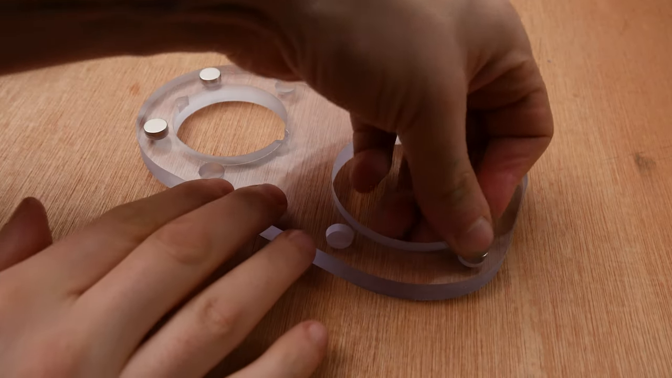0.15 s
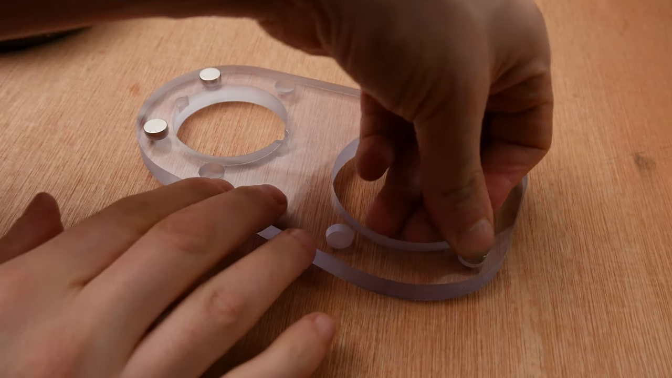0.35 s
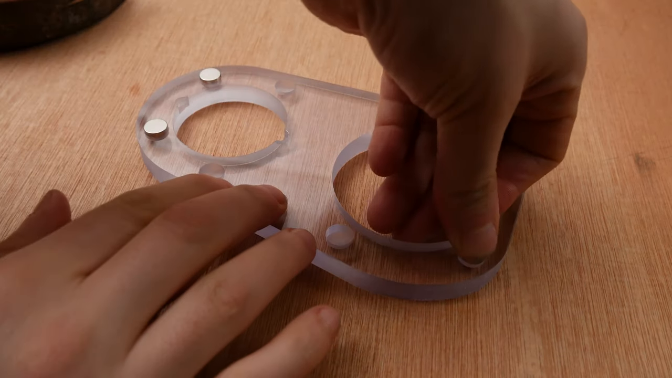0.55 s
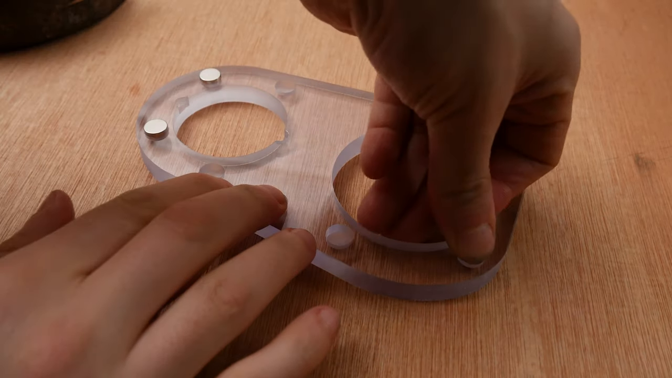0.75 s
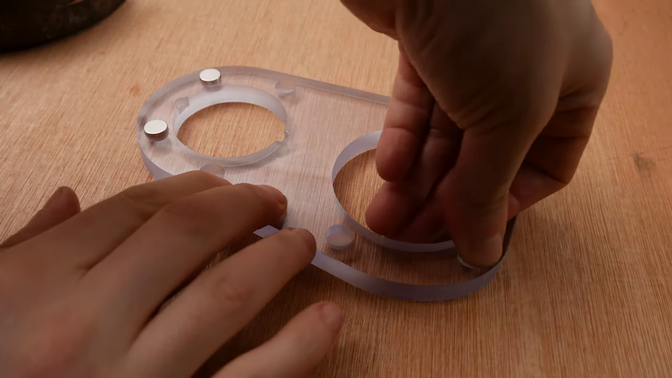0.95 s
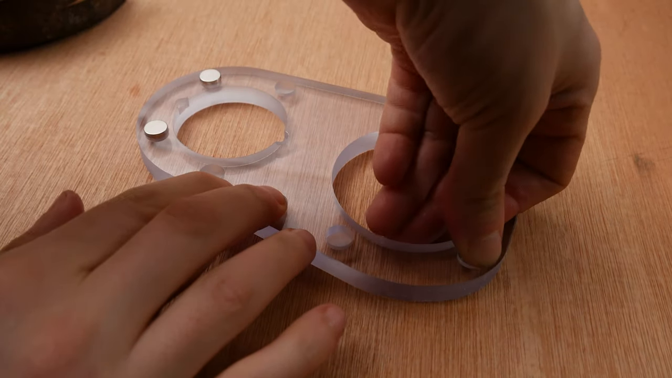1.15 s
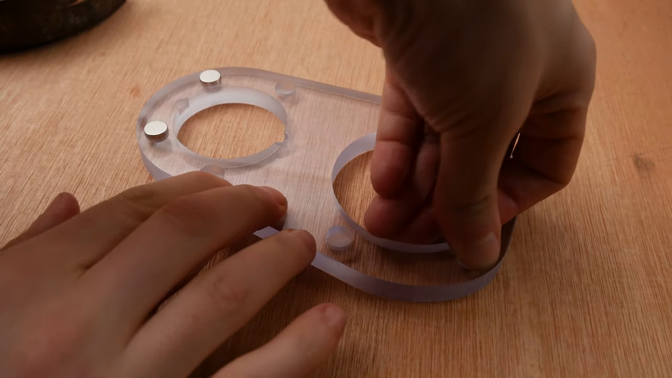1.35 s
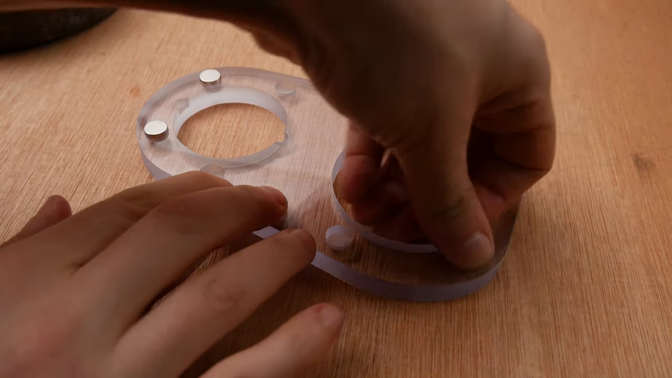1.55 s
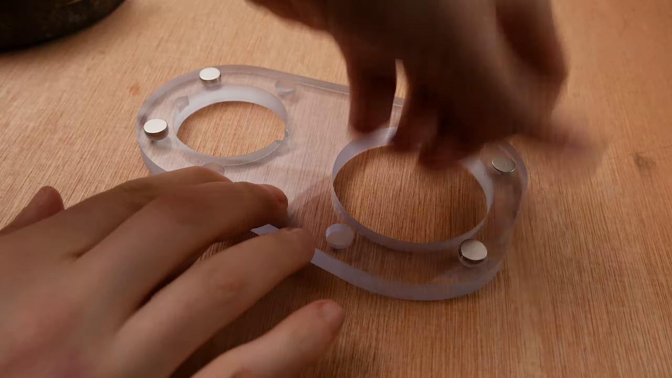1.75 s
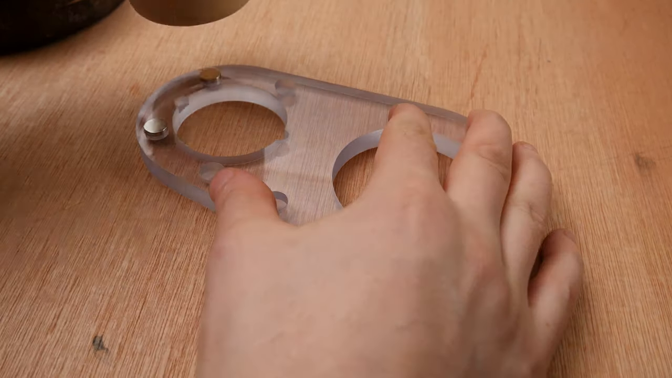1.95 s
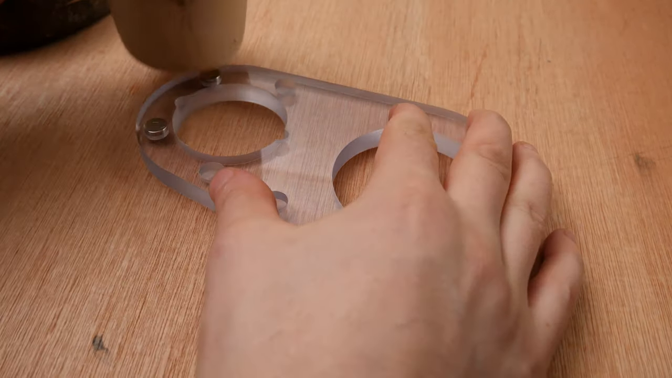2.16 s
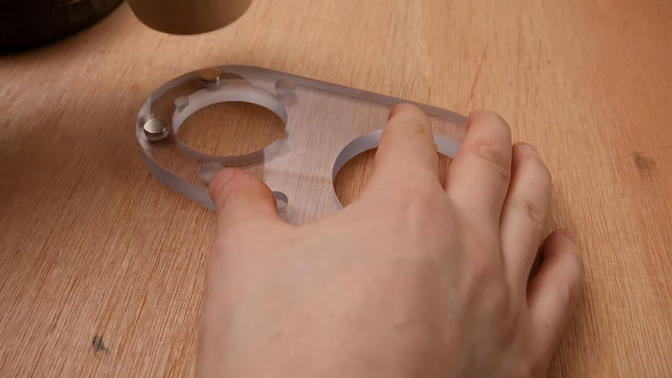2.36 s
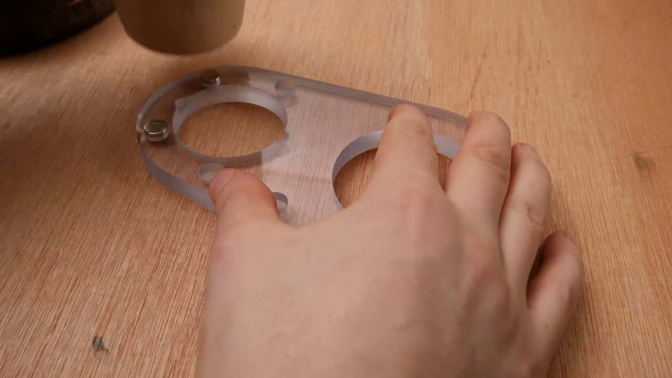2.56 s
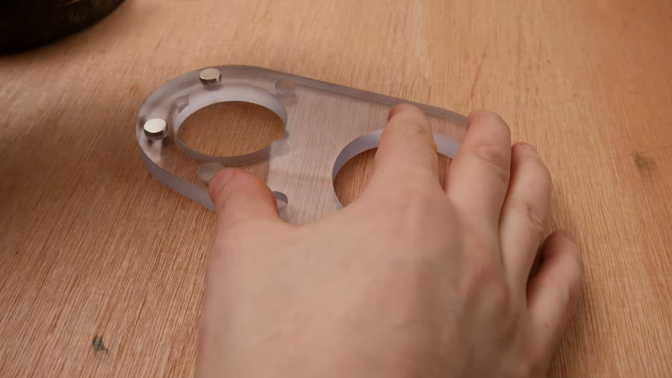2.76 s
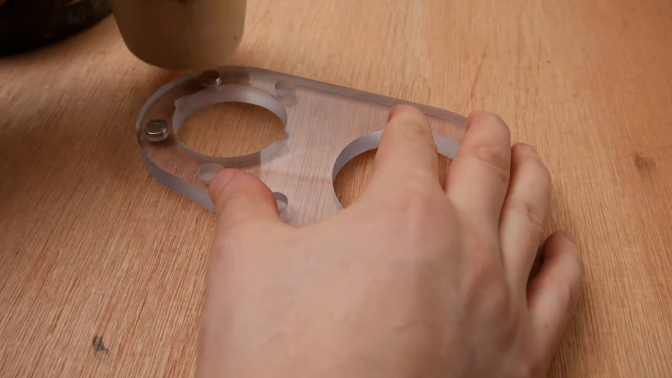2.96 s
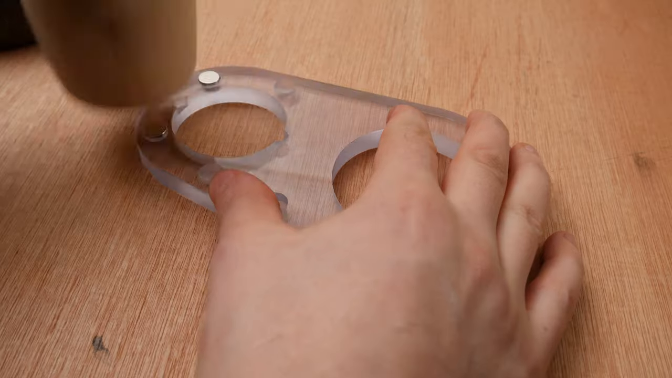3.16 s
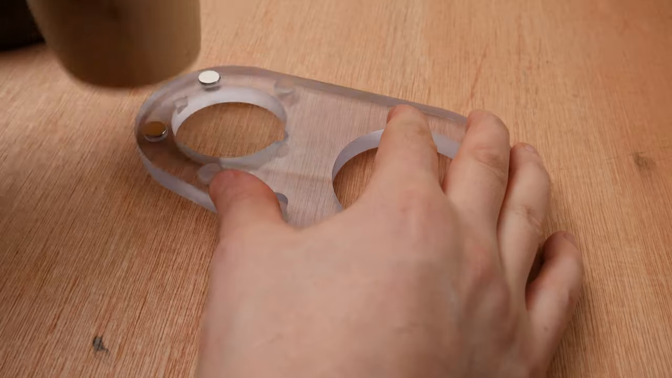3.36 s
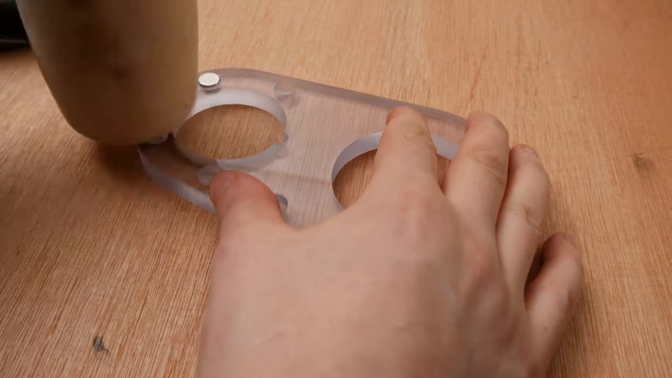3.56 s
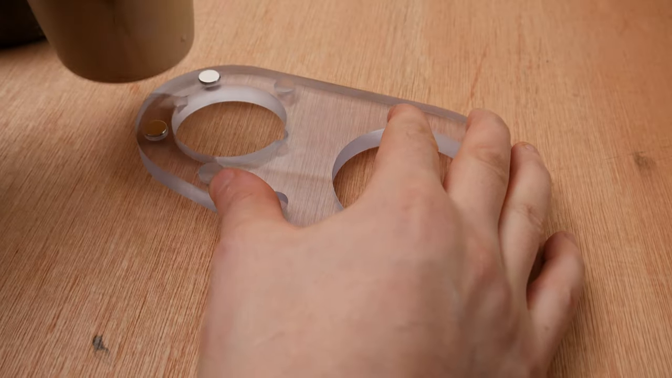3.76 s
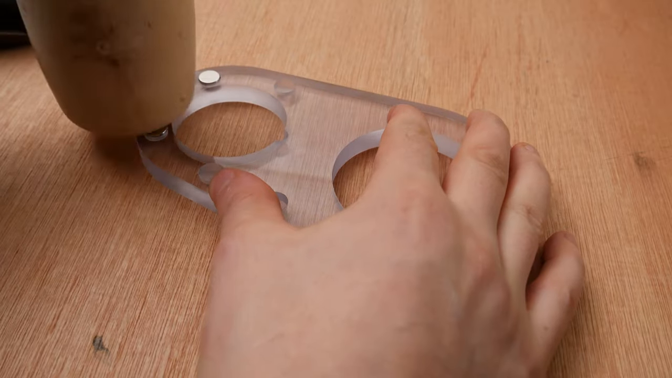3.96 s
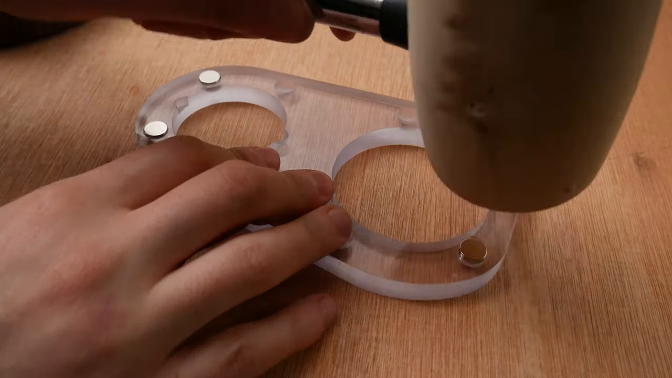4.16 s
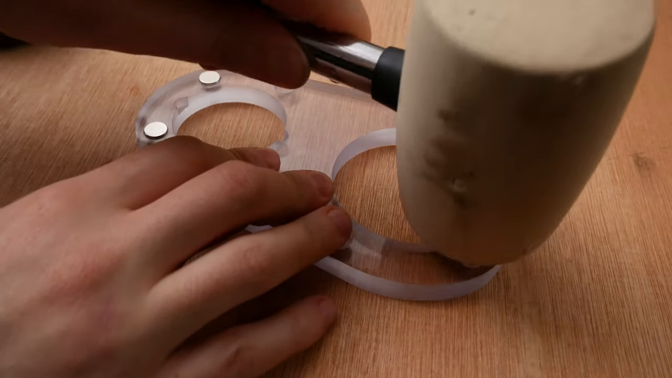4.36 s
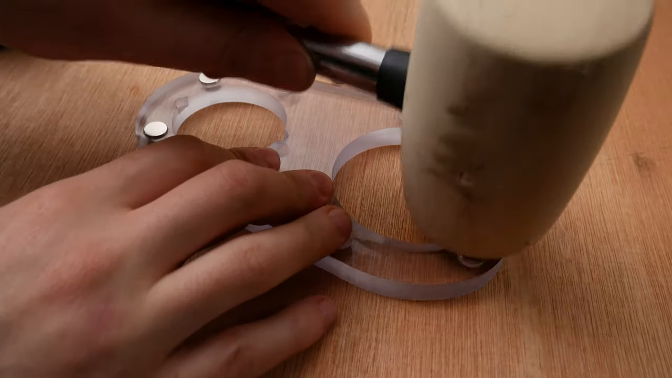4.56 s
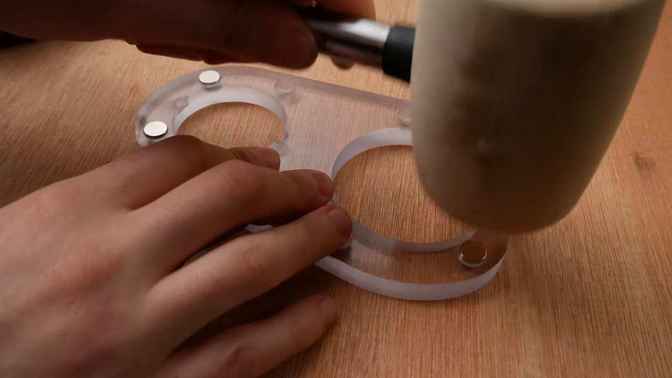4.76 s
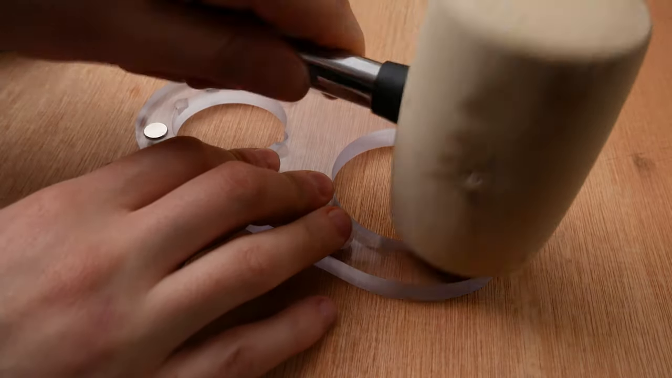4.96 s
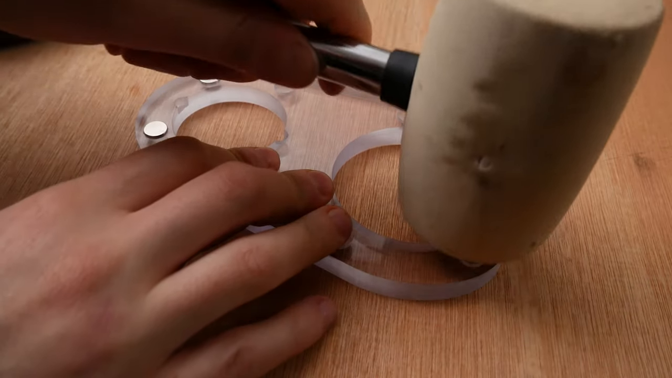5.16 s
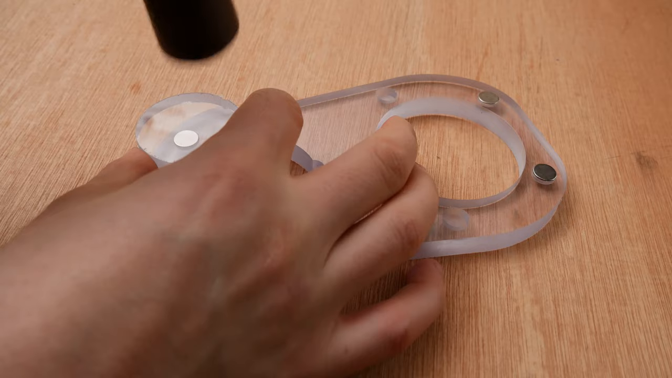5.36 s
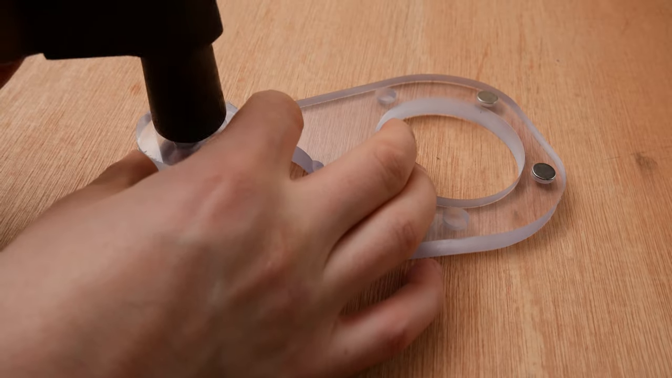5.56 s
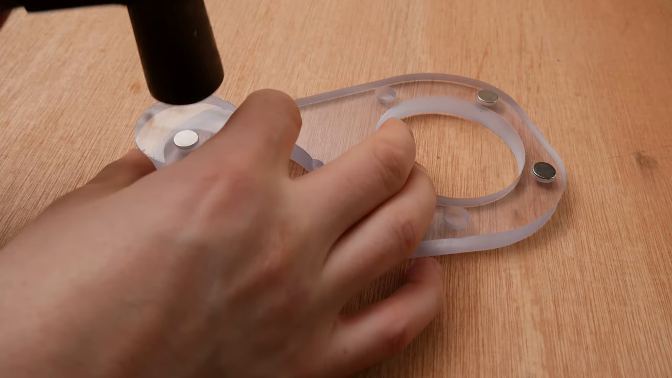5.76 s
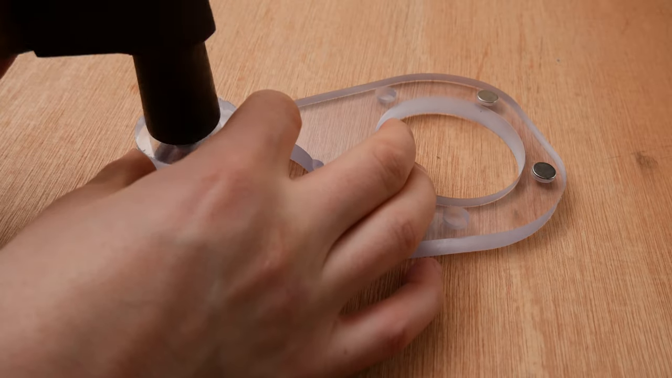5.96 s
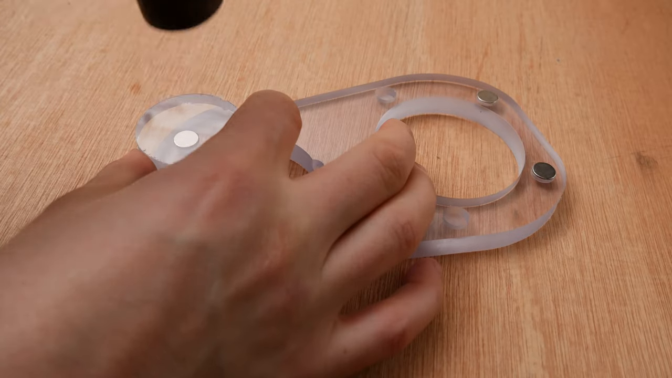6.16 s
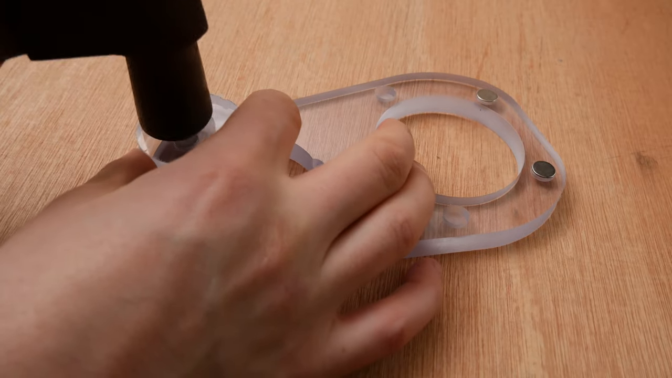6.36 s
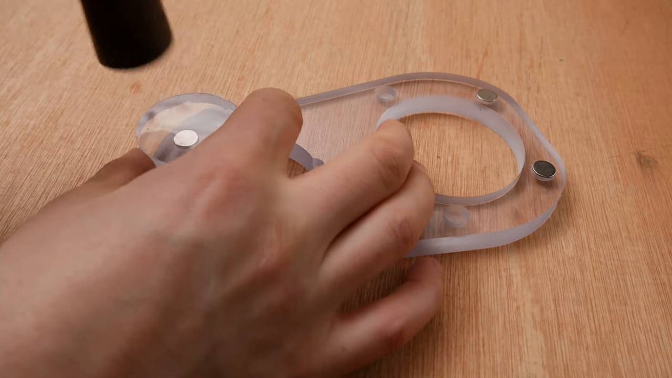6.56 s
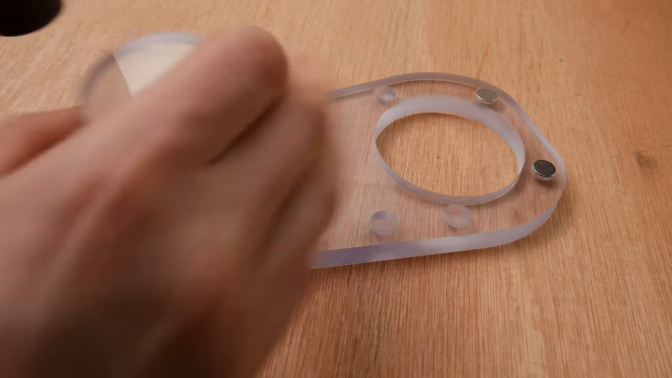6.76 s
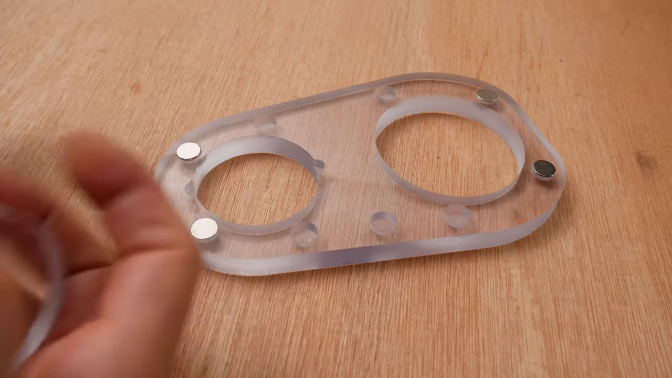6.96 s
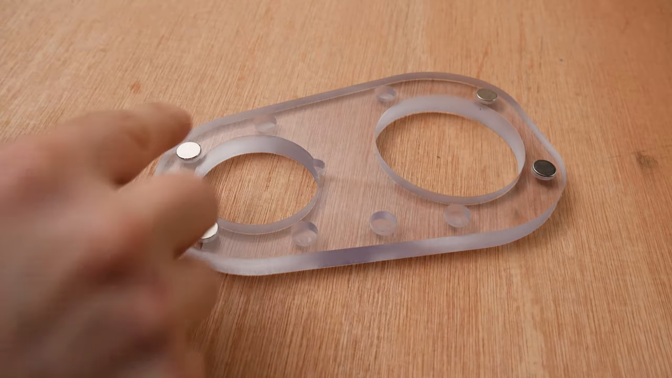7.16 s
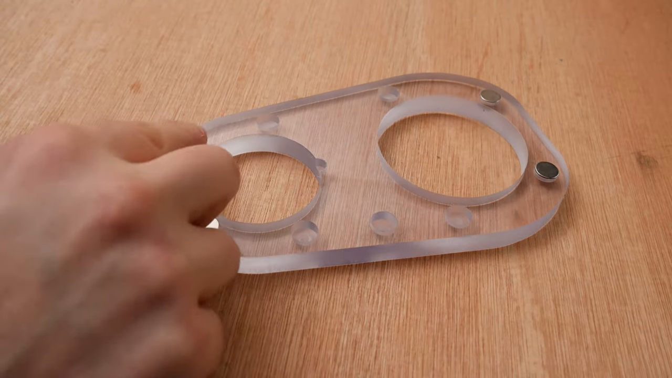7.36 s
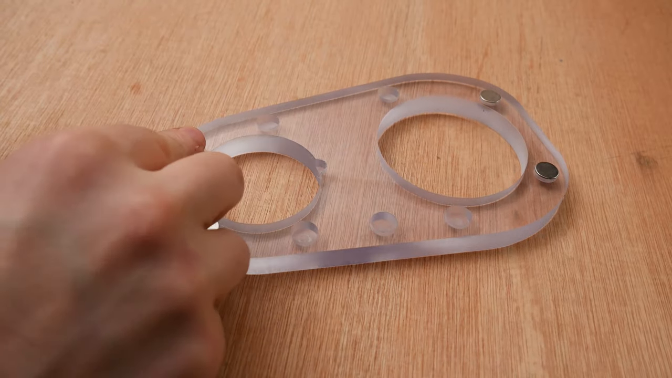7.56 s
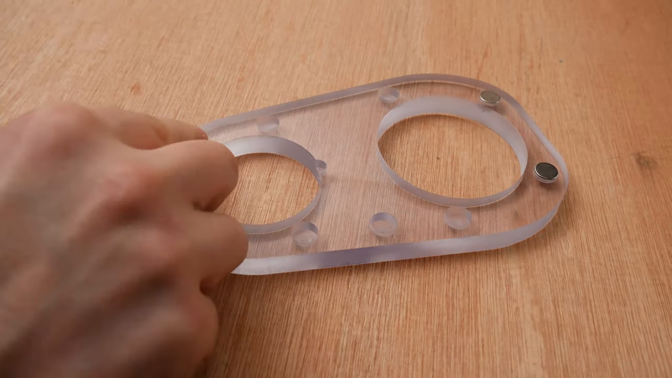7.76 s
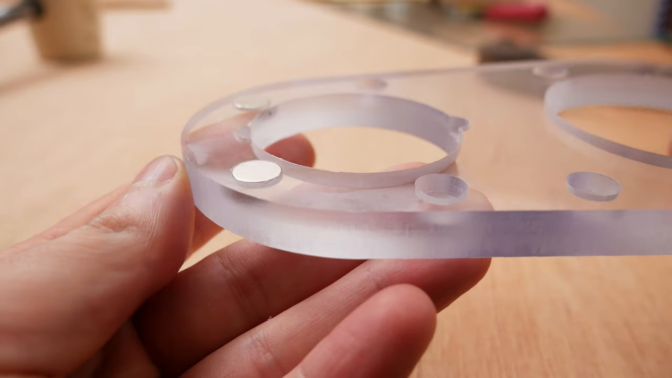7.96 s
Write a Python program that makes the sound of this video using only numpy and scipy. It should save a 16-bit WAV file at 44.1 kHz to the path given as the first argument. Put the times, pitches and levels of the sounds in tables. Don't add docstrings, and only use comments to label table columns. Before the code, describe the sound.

On a workbench, a mallet and then a small hammer pound magnets into plastic, overloading the microphone, between quiet finger rubbing and tiny clicks.

```python
import sys
import numpy as np
from scipy import signal
from scipy.fft import rfft, irfft
from scipy.io import wavfile
from scipy.ndimage import uniform_filter1d

SR = 44100
rng = np.random.default_rng(int(sys.argv[2]) if len(sys.argv) > 2 else 0)


def level_to_linear(level):
    exponent = np.asarray(level, float) / 20
    return 10 ** exponent


def master(y):
    cut = np.clip(np.atleast_2d(y).T, -1, 1)
    pcm = np.round(cut * 32767)
    wavfile.write(sys.argv[1], SR, pcm.astype(np.int16))


N = 357210

# start_s, thump_db, ring_out_db, hardness_db (crack over ring-out: how squarely it hits)
BLOWS = [(2.1411, 16, -7.5, -4.5), (2.5003, 11.5, -9, 1.5), (2.8978, 19, -2.5, 1), (3.2660, 7.5, -8, 1),
         (3.6274, 24, 4.5, 1.5), (3.989, 6.5, -9.5, 1.5), (4.3112, 16, -4.5, -12.5),
         (4.6406, 1, -15.5, -13), (4.8904, -10, -29, -21), (5.028, 10, -1, -4), (5.5010, 22, 4.5, 8),
         (5.982, 11, -17.5, 24), (6.3340, 20, 5.5, 9)]
HAMMER_FROM_S = 5.4
# start_s, peak_db, pitch_hz, brightness_db_per_octave
SLAPS = [(2.15, -3, 703.3, -7.5), (2.158, -3, 729.2, -0.3792), (2.51, 1.5, 665, -0.9558),
         (2.517, -6.5, 692.8, -3.4052), (2.528, -4, 630.1, 2), (2.911, 5, 630, -4.92),
         (2.921, -0.5, 1151, 1.29), (2.95, 2, 593.4, 0.5), (3.274, -3.5, 711.6, -0.0719),
         (3.632, -4.5, 741.9, 3.5561), (3.643, -1, 545.7, 0.3284), (3.68, 2.5, 616.3, 4.5),
         (3.998, -1, 679.1, -0.0058), (4.327, 6, 639.4, 1.7683), (4.352, 1.5, 488.7, 2.5),
         (4.382, -3.5, 573.7, 2.5), (4.649, -.5, 630, -2.0117), (4.891, -7.5, 560, -7),
         (4.92, -10, 639.3, -5), (5.044, 3.5, 751.9, 3), (5.099, -8, 669.7, -1.5), (5.51, 9, 1202, 2),
         (5.986, -1.5, 456.2, -3), (6.414, -5.5, 630, 3), (6.46, -10, 1345, -1), (6.477, -15, 456.9, -1)]
# start_s, peak_db
CLACKS = [
    (5.178, -2.5),
    (5.243, -9.5),
    (5.277, -8.5),
    (5.31, -24),
    (5.329, -26),
]
CLACK_HZ, CLACK_BRIGHT = 740, 4.5
# start_s, peak_db, thud_db (re peak), ring_out_db (re peak)
TICKS = [(0.0508, -57, -20.5, -18), (0.6976, -61.5, 12.5, -15), (1.4919, -55.5, 1.5, -20),
         (1.6063, -56.5, -22.5, -14.5), (1.6116, -45.5, -4, -17), (1.7304, -54.5, 3, -14),
         (1.7777, -41, -8.5, -17.5), (2.0217, -53, 2, -22.5), (2.3381, -59, -5, -18.5),
         (3.2246, -44, 13, -24.5), (3.4641, -50, -4, -11), (4.2247, -56.5, -5, -10.5),
         (7.4088, -58, 8, -31), (7.4203, -57, 4, -26.5), (7.4804, -63.5, -9.5, -15),
         (7.8531, -57.5, 4, -27), (7.8616, -62.5, -6.5, -20)]


def at(table, hz):
    points = np.array(table)
    return np.interp(np.log(hz), np.log(points[:, 0]), points[:, 1])


def colour(table):
    hz = np.arange(1, N // 2 + 2) * SR / N
    x = irfft(rfft(rng.standard_normal(N)) * level_to_linear(at(table, hz)), N)
    return x / x.std()


def walk(rate):
    k = int(SR / rate)
    return uniform_filter1d(np.repeat(rng.standard_normal(N // k + 1), k), k)[:N]


def fade(t, t60):
    return np.exp(-np.log(1000) * t / t60)


def modes(t, hz, db, t60):
    return sum(level_to_linear(d) * fade(t, r) * np.sin(2 * np.pi * f * t) for f, d, r in zip(hz, db, t60))


def crack(t, hz, ms):
    band = signal.butter(3, [hz / 2, hz * 2], "band", fs=SR, output="sos")
    noise = signal.sosfilt(band, rng.standard_normal(len(t)))
    return 2 * noise * np.exp(-t / (ms / 1000))


def strokes(rows, rise):
    now = np.arange(N) / SR
    return sum(level_to_linear(db - 10 * np.maximum(now - s, (s - now) / rise) / fall_s) for s, db, fall_s in rows)


def add(out, s, sound, rate=SR):
    edits_s = [2.03, 4.232, 5.397, 7.868, 9]
    scene_end_s = min(e for e in edits_s if e > s)
    a = int(s * rate)
    b = min(a + sound.shape[-1], out.shape[-1], int(rate * scene_end_s))
    out[..., a:b] += sound[..., :b - a]


def shop():
    # start_s, shop_noise_db, bench_sway_db
    stretches = [
        (0, 3, -65.5),
        (2.031, 5, -50.5),
        (4.232, 5.5, -45),
        (5.397, 7, -57.5),
        (6.9, 2.5, -54.5),
        (7.868, 1.5, -68),
    ]
    # pitch_hz, level_db (per Hz)
    shop_tone = [(16, -27), (28, 2.5), (39, -17), (66, -35), (118, -20.5), (176, -34), (353, -28),
                 (426, -39.5), (527, -24.5), (670, -24.5), (765, -34.5), (874, -29), (1270, -46),
                 (14400, -53), (16400, -61.5)]
    noise_base_db = -66
    start, noise_db, sway_db = np.transpose(stretches)
    stretch = np.searchsorted(start, np.arange(N) / SR, "right") - 1
    sway = colour([(5, -20), (13, -12), (17, 0), (20, -16), (26, -40), (60, -80)])
    level_db = noise_base_db + noise_db[stretch]
    mid = colour(shop_tone) * level_to_linear(level_db + 1.2 * walk(3))
    side = colour(shop_tone) * level_to_linear(level_db - 29)
    return np.array([mid + side, mid - side]) + sway * level_to_linear(sway_db[stretch])


def fingers():
    # peak_s, level_db, fade_s (per 10 dB)
    rub = [(.005, -75, .06), (.17, -70, 0.0851), (.22, -72.5, 0.10375), (.39, -77, 0.0749),
           (.71, -79, 0.1767), (1.37, -83.5, 0.0334), (1.495, -65.5, 0.0452), (1.61, -64.5, 0.0513),
           (1.771, -56.5, 0.01953), (6.708, -69.5, 0.24), (7.054, -71.5, .03), (7.415, -64, 0.0243)]
    # pitch_hz, level_db (per Hz)
    rub_tone = [(80, 13.5), (300, 7.5), (1000, 0), (3000, -7), (8000, -11), (11000, -20), (14000, -32)]
    # start_s, end_s, level_db
    hands_on = [
        (0.1, 1.5, -80),
        (6.7, 7.5, -82.5),
        (7.48, 8, -76.5),
    ]
    # start_s, peak_db, pitch_hz, second_pitch_hz
    snaps = [(6.7244, -61, 5715, 11660), (6.7595, -64, 5710, 12700), (6.8496, -63, 8882, 11860),
             (6.9744, -64.5, 6193, 10710), (7.0544, -49.5, 8615, 14740), (7.0744, -57, 7460, 12700),
             (7.1156, -77, 6450, 11100), (7.1157, -48, 7504, 10290), (7.1362, -66.5, 6230, 10600)]
    # peak_s, peak_db, fade_s (per 10 dB)
    drag = [
        (6.6, -48, 0.1828),
        (6.65, -44, 0.1297),
        (6.76, -52.5, 0.0062),
        (6.87, -58, 0.0006),
        (7.41, -55, 0.0718),
    ]
    # pitch_hz, width_hz, level_db
    drag_tones = [(275, 20, -2.5), (544.5, 36, -1.5), (863, 15.644, -22)]

    out = np.zeros(N)
    t, now = np.arange(int(.1 * SR)) / SR, np.arange(N) / SR
    for s, db, thud_db, _ in TICKS:
        hz = 1743.1 * np.exp(0.087 * rng.standard_normal())
        click = modes(t, [hz, 130], [-4, thud_db], [.012, .06])
        click += level_to_linear(-8.5) * crack(t, 3047, 2.283)
        click += level_to_linear(-18.5) * crack(t, 9000, 1.174)
        add(out, s, level_to_linear(db) * click)
    for s, db, hz, high_hz in snaps:
        snap = modes(t, [hz, high_hz], [-5, -5], [.02, .015]) + level_to_linear(-15) * crack(t, 9470, 3.37)
        add(out, s, level_to_linear(db) * snap)

    resting = sum(level_to_linear(db) * (now > a) * (now < b) for a, b, db in hands_on)
    skin = strokes(rub, 0.1395) + resting
    out += colour(rub_tone) * skin * level_to_linear(6.5 + 2.1 * walk(80))

    hollow = np.zeros(N)
    for f, width, db in drag_tones:
        hollow += level_to_linear(db) * signal.lfilter(*signal.iirpeak(f, f / width, SR), rng.standard_normal(N))
    scrape = hollow / hollow.std() * strokes(drag, 0.45)
    return out + scrape * level_to_linear(-2.5 + 2.0283 * walk(40))


def blows():
    # pitch_hz, level_db, t60_s
    bench = [(96.188, -2, 0.18), (173.36, -8.5, 0.26), (241.47, -8.5, .45), (302.49, -13, 0.2),
             (355.12, -10, 0.27), (412.33, -9.5, 0.27), (548.17, -21.5, .5), (630, -9, 0.29),
             (704, -10, 0.15), (931.17, -14.5, .3)]
    out, t = np.zeros(N), np.arange(int(1.3 * SR)) / SR
    hz, db, t60 = np.transpose(bench)
    t60 = np.minimum(t60, .32)
    late = 1 - np.exp(-t / 0.036)
    sway = modes(t, [18], [-27.5], [2.2])
    for s, thump_db, ring_db, hard in BLOWS:
        hammer = s > HAMMER_FROM_S
        push_ms = 1.4 if hammer else 2.6 - .06 * hard
        push = np.sin(np.pi * np.minimum(t * 1000 / push_ms, 1)).clip(0) ** 1.4
        spring_hz = 35 if hammer else 62
        thump = signal.sosfilt(signal.butter(2, spring_hz, "high", fs=SR, output="sos"), push)
        spot_db = 2.5 * rng.standard_normal(len(hz))
        wood = modes(t, hz, db + spot_db, t60)
        contact = crack(t, 4500 if hammer else 2600, 0.9371)
        blow = level_to_linear(thump_db) * thump + level_to_linear(ring_db + hard) * contact + level_to_linear(ring_db) * late * (wood + sway)
        add(out, s, blow)
    return out


def ring_out(strikes):
    # pitch_hz, level_db (per Hz)
    mallet_tone = [(18, -32), (30, -11.5), (100, -15.5), (127, -3), (345, -9.5), (740, -12), (844, -16),
                   (2480, -24), (4780, -41), (6900, -43.5), (9970, -56), (13700, -56.5), (16000, -70)]
    # pitch_hz, level_db (per Hz)
    hammer_tone = [(18, -32), (30, -2.5), (70, -2), (134, -8.5), (259, 0.5), (426, -8.5), (801, -15.5),
                   (2540, -17.5), (5040, -27.5), (5450, -26), (5900, -34), (8520, -35.5), (16000, -63.5)]
    # pitch_hz, t60_s
    ring_t60 = [(40, 0.43), (160, 0.3092), (420, 0.30738), (1100, 0.27399), (2900, 0.27328),
                (6000, 0.24679), (9000, 0.17), (14000, 0.052)]
    # pitch_hz, side_db (re mid)
    apart = [(60, -33), (110, -32), (200, -44), (380, -42), (700, -37.5), (1290, -37), (2380, -33.5),
             (4400, -25.5), (8120, -22.5), (15000, -15)]
    bands_hz = 35 * 2 ** np.arange(0, 9, 1 / 3)
    step = 30
    power = np.zeros((len(bands_hz), N // step))
    t = np.arange(0, int(.9 * SR), step) / SR
    lasting = fade(t, at(ring_t60, bands_hz)[:, None] / 2)
    early = fade(t, 0.037 / 2)
    for s, db, bright, rise, cut_hz, top_hz, early_db in strikes:
        body_db = at(hammer_tone if s > HAMMER_FROM_S else mallet_tone, bands_hz)
        tilt_db = bright * np.log2(np.minimum(bands_hz, 4500) / 500)
        gain = level_to_linear(db + body_db + tilt_db) ** 2 * bands_hz / 500
        gain /= (1 + (cut_hz / bands_hz) ** 4) * (1 + (bands_hz / top_hz) ** 4)
        fading = lasting + level_to_linear(early_db) ** 2 * early
        add(power, s, gain[:, None] * fading * (1 - np.exp(-(t / rise) ** 2)), SR / step)

    hz = np.arange(N // 2 + 1) * SR / N + 1e-9
    mid, side, rattle = 0, 0, walk(260)
    for f, p in zip(bands_hz, power):
        band = np.exp(-(np.log2(hz / f) * 4) ** 2)
        one, other = (irfft(rfft(rng.standard_normal(N)) * band, N) for _ in range(2))
        unsteady_db = 1.7 * rattle * min(f / 900, 1) + 1.6 * walk(25)
        size = np.repeat(np.sqrt(p), step) * level_to_linear(unsteady_db) / one.std()
        mid = mid + size * one
        side = side + size * other * level_to_linear(at(apart, f) - 5.0)
    return np.array([mid + side, mid - side])


def steel(strikes):
    # pitch_hz, level_db (re ring-out), t60_s
    loose_steel = [(5335, -33, .23), (6288, -38, .2), (6713, -33, .24), (7607, -45, .4), (8100, -40, .17),
                   (8420, -36, .21), (8778, -41, .27), (9376, -33, .22), (9900, -41, .18),
                   (10450, -46, .29), (10900, -44, .17), (11755, -42, .24), (12200, -40, .2),
                   (12650, -45, .16), (13220, -43, .23), (13470, -47, .19), (14000, -49, .17),
                   (14700, -51, .16)]
    # pitch_hz, level_db, t60_s
    hammer_head = [(1750, -22, .15), (2645, -19, .2), (2757, -18, .24), (2935, -20, .2), (3391, -25, .27),
                   (3919, -25, .43), (4388, -30, .25), (4613, -22, .33), (5410, -29, .25)]
    # pitch_hz, level_db, t60_s
    bell = [(5276, 0, .98), (5269.7, -15, 1.3)]
    # start_s, head_ring_db, tilt_db_per_octave (above 3 kHz), long_ring_db
    head_blows = [
        (5.5010, -7, -4, -38.5),
        (5.9827, -10, -29.5, -50),
        (6.335, -2, 12, -27),
    ]

    def ring(table):
        tones = np.array([modes(t, [f], [db], [t60]) for f, db, t60 in table])
        return tones * (1 - np.exp(-t / 0.012))

    out, t = np.zeros(N), np.arange(int(.45 * SR)) / SR
    loose = ring(np.array(loose_steel) * [1, 1, .95])
    head = ring(hammer_head)
    treble_db = -5 * np.log2(np.array(loose_steel)[:, 0] / 9000).clip(0)
    for s, db, bright, *_ in strikes:
        shake_db = db + min(db + 18, 0) + 2.0 * min(bright, 1) + 5 * (s > HAMMER_FROM_S)
        chance_db = 4.0 * rng.standard_normal(len(loose))
        add(out, s, level_to_linear(shake_db + treble_db + chance_db) @ loose)

    long = np.arange(int(1.3 * SR)) / SR
    swell = 1 - np.exp(-long / .02)
    octaves_above = np.log2(np.maximum(np.array(hammer_head)[:, 0] / 3000, 1))
    for s, head_db, tilt, bell_db in head_blows:
        chance_db = 1.5 * rng.standard_normal(len(head))
        add(out, s, level_to_linear(head_db + tilt * octaves_above + chance_db) @ head)
        add(out, s, level_to_linear(bell_db) * modes(long, *np.transpose(bell)) * swell)
    return out


def slaps():
    out, t = np.zeros(N), np.arange(int(.08 * SR)) / SR
    landing = np.sin(np.pi / 2 * np.minimum(t / .00025, 1)) ** 2
    overtone = np.array([1, 1.7, 2.9, 4.3, 6.4])
    overtone_db = np.array([-2, -7, -11.5, -17.5, -23])
    overtone_t60 = [0.033, 0.026, 0.0097, 0.029, 0.013]
    for s, db, hz, bright in SLAPS + [(s, db, CLACK_HZ, CLACK_BRIGHT) for s, db in CLACKS]:
        plate = modes(t, hz * overtone, overtone_db + bright * np.log2(overtone), overtone_t60)
        crack_db = -11 + 1.1154 * min(db, 0) + .8 * min(bright, 0)
        add(out, s + .0006, level_to_linear(db) * landing * (plate + level_to_linear(crack_db) * crack(t, 2300, 1.3)))
    for s, db in CLACKS:
        add(out, s, level_to_linear(3.5 * db - 12) * crack(t, 8000, 1.0387))
    return out


def scene():
    open_hz = 40000
    blow_early_db = 7.5
    strikes = []
    for s, _, ring_db, hard in BLOWS:
        hammer = s > HAMMER_FROM_S
        bright = 1.1 if hammer else 2.228 + 0.133 * hard
        strikes.append((s, ring_db, bright, .007 if hammer else .012, 25, open_hz, blow_early_db))
    strikes += [(s, db - 12 - .3 * bright, bright, .0015, 520, open_hz, 7) for s, db, _, bright in SLAPS]

    light = [(s, db - 16, CLACK_BRIGHT, .0015, 560, 5000, 7.5) for s, db in CLACKS]
    light.append((5.984, -23, 6, .003, 700, 2500, 6.5))
    light += [(s, db + ring_db, 3.5, .003, 150, open_hz, blow_early_db) for s, db, _, ring_db in TICKS]

    near = fingers() + blows() + steel(strikes) + slaps()
    bright_echo = near + 12 * np.gradient(uniform_filter1d(near, size=6))
    wall = level_to_linear(-39) * np.roll(bright_echo, int(.0043 * SR)) * np.array([[1], [-1]])
    return shop() + near + wall + ring_out(strikes + light)


def band_limit(x):
    return signal.sosfilt(signal.butter(12, 16600, fs=SR, output="sos"), x)


def record(dry):
    knee, full = 9, .995
    flat = full * dry / (1 + np.abs(dry) ** knee) ** (1 / knee)
    top = signal.ellip(8, .3, 30, 15700, fs=SR, output="sos")
    return band_limit(signal.sosfilt(top, flat))


dry = scene()
out = record(dry)
master(out)
```